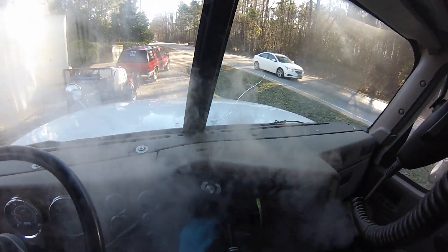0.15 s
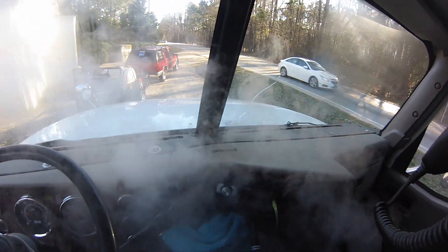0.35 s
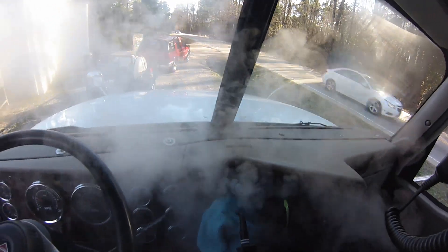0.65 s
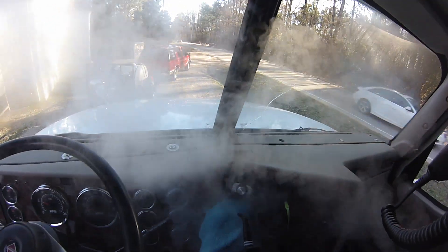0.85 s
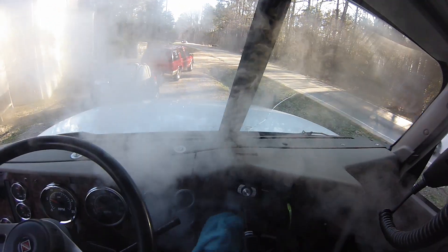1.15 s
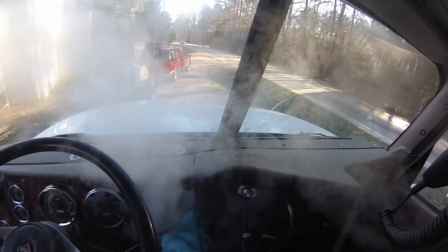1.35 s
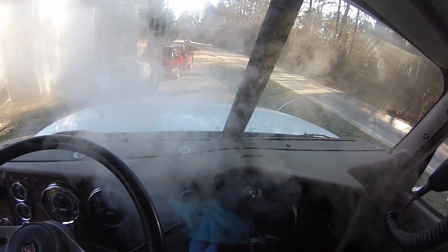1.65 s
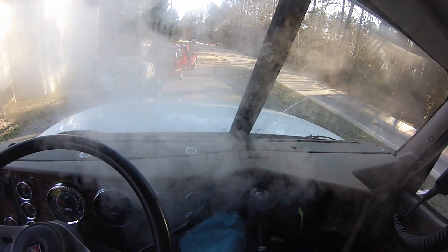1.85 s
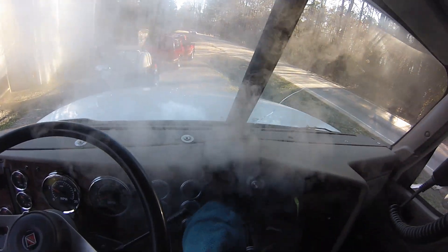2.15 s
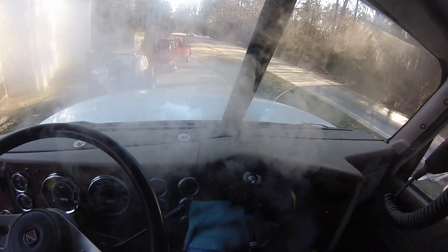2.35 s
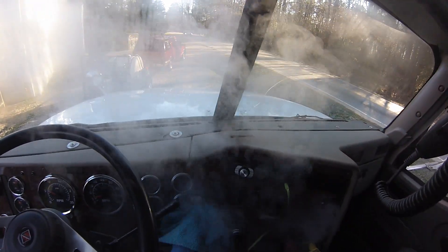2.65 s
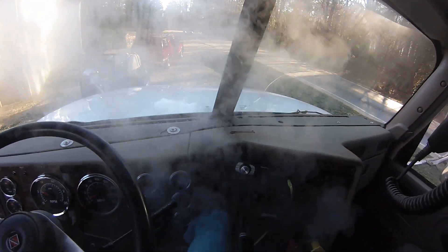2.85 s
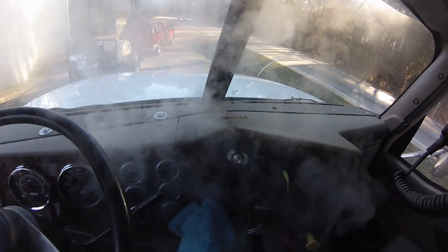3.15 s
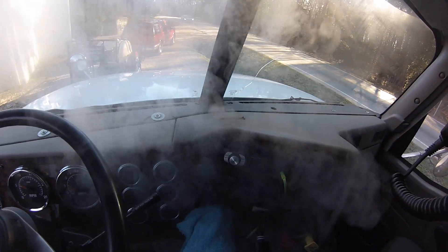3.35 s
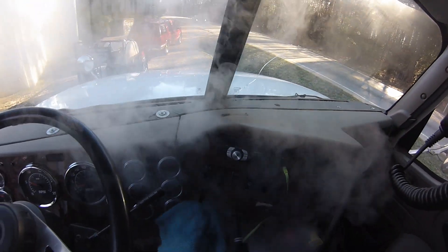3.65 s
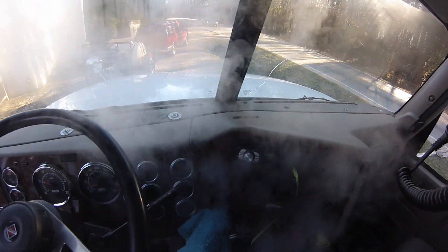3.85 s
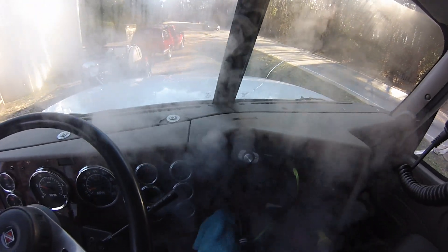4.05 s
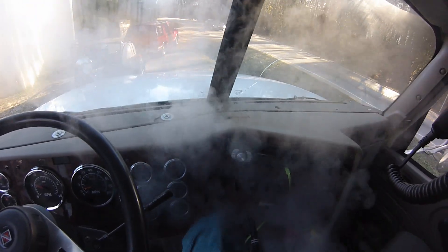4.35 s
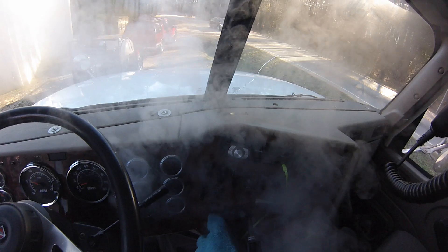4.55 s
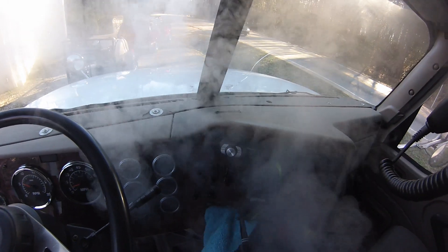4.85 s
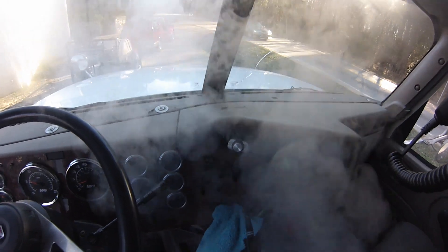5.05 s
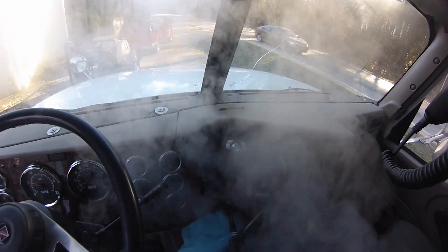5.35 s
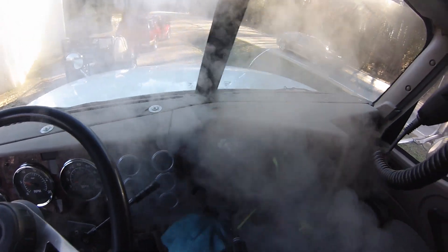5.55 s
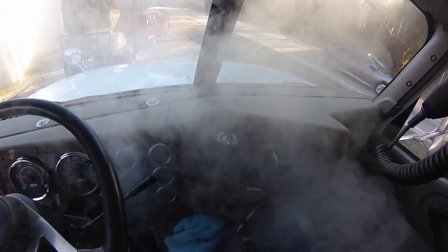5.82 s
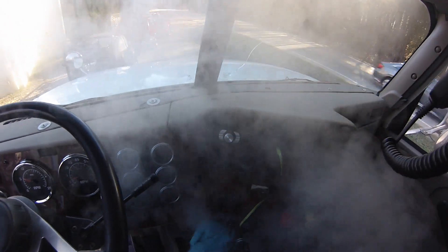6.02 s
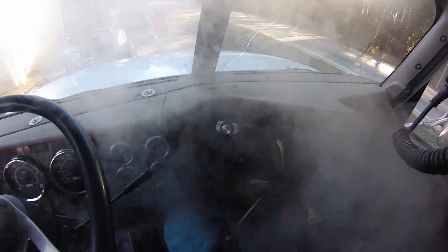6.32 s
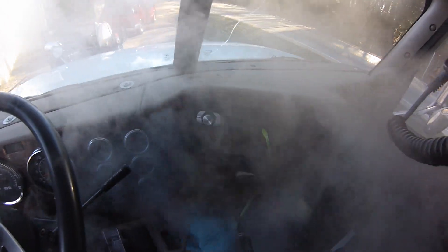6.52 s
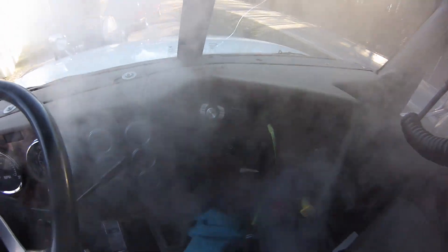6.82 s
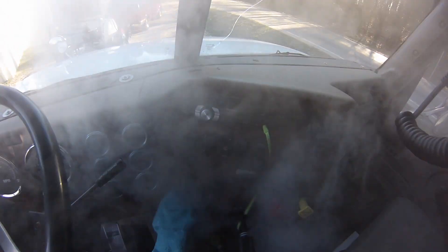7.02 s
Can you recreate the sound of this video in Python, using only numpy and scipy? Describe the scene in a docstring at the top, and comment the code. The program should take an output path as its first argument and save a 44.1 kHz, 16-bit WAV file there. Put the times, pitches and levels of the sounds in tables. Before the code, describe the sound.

A steam jet is already blowing at 0 s and continues to the end at about 7 s, close to a mono microphone in a small truck cab with very short reflections. Bright hiss with fine droplet spitting mixes with a strong sizzle around 5 to 6 kHz on plastic, sliding in colour. Brief dips come near 0.6 and 1.6 s. Light wand knocks fall around 0.3, 0.7 and 1.8 s, with sharper ticks at 2.15 and 3.1 s. A faint low car drone fades by 2.5 s; soft handling thumps also occur early. From about 3 s the hollow tone deepens as steam enters a recess. A dull knock comes at 4.25 s and a thin, wavering whistle peaks near 4.5 s. From 5.5 s the steam alternates rapidly between sizzle and airy gaps, with knocks near 6.2 and 6.75 s. A quiet motor hum runs underneath.

```python
"""The jet of a steam cleaner's nozzle, filtered noise with spitting droplets, hisses near a mono microphone.
It is swept over the dashboard of a truck cab: noise with two sliding resonances sizzles on the panel,
duller noise rushes along it, and resonant noise rings in hollows and gaps. A faint edge tone whistles.
Damped noise bursts are the wand's knocks. Below lie sine hums of a motor and of a car passing outside,
and the low noise of the cab with soft bumps of the hand that holds the microphone."""
import sys
import numpy as np
from scipy import signal
from scipy.fft import rfft, irfft, next_fast_len
from scipy.io import wavfile
from scipy.ndimage import uniform_filter1d

SR = 44100
rng = np.random.default_rng(int(sys.argv[2]) if len(sys.argv) > 2 else 0)


def digitize_waveform(pressure):
    """Quantize a signal to 16-bit integers and store it at the path in sys.argv[1].

    Rows of a 2-D input are taken as channels; values are limited to [-1, 1].
    """
    field = np.atleast_2d(pressure).T
    bounded = np.clip(field, -1, 1)
    quanta = np.round(bounded * 32767).astype(np.int16)
    wavfile.write(sys.argv[1], SR, quanta)


N = 316726
TIME = np.arange(N) / SR
FRAME_S = np.arange(N // 128 + 9) * 128 / SR  # times of the short-time spectra, 128 samples apart
BIN_HZ = np.fft.rfftfreq(512, 1 / SR)


def amp(db):
    """Level to amplitude: 20 dB is a factor of ten."""
    return 10 ** (np.asarray(db) / 20)


def unit(x):
    """Normalisation to a root-mean-square value of 1."""
    return x / np.sqrt(np.mean(x ** 2) + 1e-20)


def curve(rows, t=TIME):
    """Linear interpolation of a table's columns, its first column being time, at times t."""
    s, *columns = np.transpose(rows)
    return [np.interp(t, s, column) for column in columns]


def spectrum(points, hz):
    """Spectral envelope, linear in dB over log frequency; it drops 60 dB in the octave beyond each end."""
    f, db = np.transpose(points)
    knots_hz = np.r_[f[0] / 2, f, f[-1] * 2]
    knots_db = np.r_[db[0] - 60, db, db[-1] - 60]
    return amp(np.interp(np.log(hz + 1), np.log(knots_hz), knots_db))


def colour(x, gain):
    """Linear filtering: the spectrum of x times a gain that is a function of frequency; rms 1."""
    size = next_fast_len(len(x))
    filtered = rfft(x, size) * gain(np.fft.rfftfreq(size, 1 / SR))
    return unit(irfft(filtered, size)[:len(x)])


def drift(hz):
    """Low-passed random fluctuation: noise that weakens gradually above about hz; rms 1."""
    t = FRAME_S
    low_pass = 1 / (1 + (np.fft.rfftfreq(len(t), t[1]) / hz) ** 2)
    slow = irfft(rfft(rng.standard_normal(len(t))) * low_pass, len(t))
    return unit(np.interp(TIME, t, slow))


def add(mix, s, sound):
    """Superposition: adds a sound to the mix, in place, from time s."""
    part = mix[max(round(s * SR), 0):][:len(sound)]
    part += sound[:len(part)]


def turbulence(shape, patchy_db, waver_db=0):
    """Turbulent noise: random short-time spectra; eddies make quick patches, the swinging jet slower ones."""
    real, imaginary, eddies, swing = rng.standard_normal((4, len(FRAME_S), len(BIN_HZ)))
    # smoothing over frames (time), then over bins (frequency)
    eddies = unit(uniform_filter1d(uniform_filter1d(eddies, size=12, axis=0), size=7, axis=1))
    swing = unit(uniform_filter1d(uniform_filter1d(swing, size=48, axis=0), size=3, axis=1))
    z = (real + 1j * imaginary) * shape * amp(patchy_db * eddies + waver_db * swing)
    return unit(signal.istft(z.T, nperseg=512, noverlap=384)[1][:N])


def echoes(x, strength, count=5):
    """Comb filtering: nearby panels return the hiss within milliseconds; the swaying nozzle makes it glide."""
    out = x.copy()
    # mean delay/s, sway rate/Hz, starting phase/cycles
    for delay, sway_hz, start in rng.uniform([.0008, .15, 0], [.004, .45, 1], (count, 3)):
        path_s = delay * (1 + np.sin(2 * np.pi * (sway_hz * TIME + start)) / 6)
        out += strength * rng.choice([-1, 1]) * np.interp(TIME - path_s, TIME, x)
    return out


def cab(x, wet, t60, count=24):
    """Reverberation between glass and panels: sparse decaying reflections that change as the nozzle travels."""
    t, hop = np.arange(SR // 10) / SR, N // count + 1
    out = x.copy()
    for k in range(count + 1):
        sparse = (rng.standard_normal(len(t)) * (rng.random(len(t)) < .05)) * (t > .002)
        taps = sparse * amp(-60 * t / t60)
        at = np.arange(max(k - 1, 0) * hop, min((k + 1) * hop, N))
        piece = x[at] * np.cos(np.pi / 2 * (at / hop - k))  # neighbouring pieces cross-fade at equal power
        add(out, at[0] / SR, wet * signal.fftconvolve(piece, taps / np.linalg.norm(taps)))
    return unit(out)


def jet(sputter):
    """Free-jet noise: turbulent mixing at the nozzle hisses brightly, and droplets spit as random impulses."""
    # slow course of the free jet: t/s, relative level/dB
    course = [(0, -26.5), (1.4, -27.5), (2.15, -27.5), (2.8, -28.5), (3.8, -27), (4.8, -28), (5.2, -27),
              (7.18, -27.5)]
    # envelope of the jet noise: f/Hz, relative level/dB
    envelope = [(3000, -36), (4100, -0.5), (4800, -4.5), (6000, 4), (7900, 8.5), (9200, 1), (11000, 0),
                (13800, -1), (15300, -6.5)]
    level_db, = curve(course)
    hiss = turbulence(spectrum(envelope, BIN_HZ), patchy_db=2.0, waver_db=0.64)
    drops = rng.standard_normal(N) * (rng.random(N) < 500 / SR)  # about 500 a second
    spray = hiss + amp(-29) * colour(drops, lambda f: spectrum(envelope, f))
    return amp(level_db + 4.5 + 0.15 * sputter) * cab(echoes(spray, strength=0.11), wet=0.42, t60=0.077)


def strike(sputter):
    """Impingement noise: the jet sizzles on the panel, coloured by two resonances of the space between."""
    # slow course of the sizzle: t/s, relative level/dB
    course = [(0, -22.5), (.3, -20.5), (.95, -20.5), (1.3, -19), (1.7, -22.3), (2.58, -23), (2.72, -18),
              (3.6, -18.5), (4.05, -17.5), (4.85, -20.5), (5.45, -16.5), (5.8, -25.5), (6.85, -24),
              (7.18, -19.5)]
    # envelope of the sizzle: f/Hz, relative level/dB
    envelope = [(3000, -53), (4150, -10.5), (4650, -1), (5300, -2), (6100, -2), (6750, -2.5), (7300, -15),
                (7900, -8.5), (9000, -15), (14000, -26)]
    # resonances between nozzle and panel, sliding as the wand moves: t/s, lower f/Hz, upper f/Hz, prominence/dB
    slide = [(0, 5500, 5900, 8), (.3, 4950, 6000, 0), (.7, 5080, 5730, 13), (.97, 4500, 5430, -1),
             (1.19, 5100, 5940, 11), (1.45, 5700, 6100, 6.5), (2.15, 5000, 5650, -1), (3, 5200, 5820, 11),
             (3.35, 5500, 6250, 5), (3.7, 5160, 5900, 5.5), (4.1, 5220, 5600, 6), (4.8, 4950, 5460, 6.5),
             (5.42, 5200, 5570, 4.5), (5.85, 5640, 6300, 9), (5.95, 4500, 5200, 6), (6.07, 5400, 5950, 4.5),
             (7.18, 5360, 6080, 10)]
    level_db, = curve(course)
    lower_hz, upper_hz, prominence_db = (column[:, None] for column in curve(slide, FRAME_S))
    peaks = sum(1 / (1 + ((BIN_HZ - hz) / 130) ** 2) for hz in (lower_hz, upper_hz))
    shape = spectrum(envelope, BIN_HZ) * amp(prominence_db * peaks)
    shape /= np.linalg.norm(shape, axis=1, keepdims=True)  # the resonances share out the power, they add none
    sizzle = turbulence(shape, patchy_db=1.38, waver_db=1.14)
    return amp(level_db + 0.88 + 0.45 * sputter) * cab(echoes(sizzle, strength=0.11), wet=0.49, t60=0.056)


def rush():
    """Wall-flow noise: the slowed, spent steam spreads over the dashboard as a duller wash."""
    # slow course of the wash: t/s, relative level/dB
    course = [(0, -40), (.65, -38.5), (.9, -37.5), (1.85, -44.5), (2.12, -37), (2.48, -46), (3.5, -37.5),
              (4.9, -39), (5.4, -36), (6.3, -35), (7.18, -36)]
    # envelope of the wash: f/Hz, relative level/dB
    envelope = [(200, -27), (420, -17), (700, -0.5), (1000, 0.5), (2000, 1.5), (2450, 1.5), (3600, 0.5),
                (4100, -4), (6000, -7)]
    level_db, = curve(course)
    wash = turbulence(spectrum(envelope, BIN_HZ), patchy_db=2.0, waver_db=1.6)
    return amp(level_db + 6.0) * cab(wash, wet=0.72, t60=0.079)


def hollows():
    """Cavity resonance: blown hollows ring, more narrowly as more steam enters the deep recess."""
    # slow course of the blowing: t/s, relative level/dB
    course = [(0, -25), (1.3, -30), (1.6, -27), (2.2, -28), (2.9, -24), (3.35, -22), (3.7, -21.5),
              (4.6, -25), (5.05, -21.5), (5.5, -23.5), (6.4, -25.5), (6.55, -22.5), (7.18, -22)]
    # steam that enters the deep recess: t/s, share of power/0-1
    recess_share = [(0, 0.38), (1.2, 0.02), (2.7, 0.09), (3.2, 1), (4.2, 0.95), (7.18, 1)]
    # envelopes of the open panel and of the deep recess: f/Hz, relative level/dB
    open_panel = [(420, -23), (510, -19), (580, -13), (680, -14), (750, -11), (830, -5), (930, -5),
                  (1020, -1), (1130, -3), (1450, .5), (1800, -5), (2000, -11), (2400, -22)]
    deep_recess = [(420, -30), (500, -22), (600, -16), (700, -13), (800, -12), (930, -12), (1100, -8.5),
                   (1250, -2.5), (1480, .5), (1750, -3.5), (1950, -12), (2400, -22)]
    # resonances and dips: f/Hz, width at half the dB height/Hz, height/dB
    modes = [(813, 35, 3), (872, 30, 1.5), (925, 40, -4), (1009, 50, 3), (1215, 70, 2.5), (1310, 50, -3),
             (1400, 70, 3), (1525, 90, 2), (1770, 80, 1.5)]
    level_db, = curve(course)
    share = np.clip(curve(recess_share)[0], 0, 1)

    def ripple(f):
        return amp(sum(db / (1 + (2 * (f - hz) / width) ** 2) for hz, width, db in modes))

    def ring(shape):
        return colour(turbulence(1, patchy_db=1.08, waver_db=0.4), lambda f: spectrum(shape, f) * ripple(f))

    blown = np.sqrt(1 - share) * ring(open_panel) + np.sqrt(share) * ring(deep_recess)
    return amp(level_db - 0.03) * cab(blown, wet=0.57, t60=0.11)


def gaps():
    """Resonance of narrow gaps: steam blown across the trim excites overlapping modes, an airy, higher note."""
    # slow course of the blowing: t/s, relative level/dB
    course = [(0, -24.5), (.9, -25), (1.35, -25), (1.8, -28.5), (2.25, -23), (2.6, -27), (3.5, -30),
              (4.7, -27), (5.6, -31), (6.3, -36), (6.62, -22.5), (6.85, -31), (7.1, -27)]
    # modes: f/Hz, half-width at -12 dB/Hz, relative level/dB
    modes = [(2916, 590, -5.5), (3097, 270, -3), (3370, 84, -4), (3680, 290, -4.5)]
    level_db, = curve(course)

    def response(f):
        return sum(amp(db) / (1 + ((f - hz) / width) ** 2) ** 2 for hz, width, db in modes)

    blown = colour(turbulence(1, patchy_db=1.5, waver_db=1.2), response)
    return amp(level_db - 1.66) * cab(blown, wet=0.82, t60=0.081)


def whistle():
    """Edge tone: the jet splits on an edge; random modulation of a rotating phasor makes it unsteady."""
    # t/s, f/Hz, level/dB
    course = [(3.7, 8150, -55), (4.1, 8050, -41), (4.5, 8040, -27.5), (4.8, 8000, -42), (5.1, 7780, -42),
              (5.35, 7800, -56)]
    hz, level_db = curve(course)
    sounding = (TIME > course[0][0]) & (TIME < course[-1][0])
    phasor = np.exp(2j * np.pi * np.cumsum(hz) / SR)
    tone = unit((phasor * (drift(130) + 1j * drift(130))).real)
    return sounding * amp(level_db) * tone


def pulse(s, length, steepness=2):
    """Bell-shaped window of height 1 centred on s, length wide at 1/e; more steepness sharpens its edges."""
    return np.exp(-abs(2 * (TIME - s) / length) ** steepness)


def wand():
    """Level modulation in dB: moving wand and uneven steam supply change each part of the steam sound."""
    # the supply falters or surges briefly: t/s (centre), length/s, change of level/dB
    spurts = [(0.62, 0.13, -6.5), (1.63, 0.12, -6), (3.78, 0.077, 0.5), (4.15, .1, 1.5), (5.8, 0.078, -3.5),
              (6.27, 0.062, -3.5), (6.734, 0.17, -4)]
    # the jet crosses an edge of the trim, which steers the steam onto the panel or into gaps and hollows:
    # t/s (centre), length/s, change of sizzle level/dB, of gap level/dB, of hollow level/dB
    crossings = [(0.343, .07, -1.5, -4.5, 3), (0.486, 0.097, -2.5, -6, 2.5), (0.563, .06, -1, 5.5, 1),
                 (0.663, .06, -4, 0.5, 4), (1.176, .1, 1.5, 0, 1.5), (2.41, .1, -2, -5, 0),
                 (2.82, 0.094, -2, -2.5, -6.5), (3.1, .09, -2.5, -2, 0), (3.285, 0.07, -5.5, 3.5, 2.5),
                 (3.484, 0.11, -5, -2, 1), (3.705, 0.19, -4, 0, -2.5), (5.54, .1, -7, 6.5, 2),
                 (5.67, .16, 2.5, 4.5, -2), (5.867, 0.054, 2.5, -2, 1), (5.948, 0.078, 0, 6, 3),
                 (6.08, 0.055, 2.5, 1, 2), (6.198, 0.079, 5.5, -1, 1), (6.577, 0.061, 2, -4, 0.5),
                 (6.854, 0.064, -5, -1, 0), (6.975, .1, 4, -2.5, 1), (7.07, 0.11, -5.5, 6.5, 2)]
    spurt = sum(change_db * pulse(s, length) for s, length, change_db in spurts)
    sizzle, gap, hollow = sum(np.outer(change_db, pulse(s, length, steepness=4))
                              for s, length, *change_db in crossings)

    def flutter(depth_db):
        """Random modulation by scrubbing, up to about 6.5 Hz, of a given rms depth."""
        return depth_db * drift(6.5)

    # factors of spurt: the share of its dB change that reaches each part
    return dict(jet=spurt + flutter(0.5),
                strike=sizzle + 0.28 * spurt + flutter(0.5),
                gaps=gap + 0.79 * spurt + flutter(1.2),
                hollows=hollow + flutter(0.7),
                rush=0.33 * spurt + flutter(0.7))


def knocks():
    """Damped impact: the wand's knocks on plastic trim are noise bursts that decay exponentially."""
    # t/s, level at onset/dB, tilt about 1 kHz/(dB per octave), time to fall 60 dB/s
    impacts = [(0.308, -27, 0, 0.25), (.69, -23, 1, 0.15), (1.764, -37, -6, 0.39), (2.154, -14.5, 2, .05),
               (3.128, -12, 1.5, 0.04), (4.254, -26, -3, 0.27), (4.928, -34, -5, .08),
               (6.226, -30, -13, 0.12), (6.759, -24, -1, 0.22)]
    # envelope before the tilt: f/Hz, relative level/dB
    envelope = [(120, -26), (260, -11), (450, -13), (900, -3), (1400, 0), (1900, -1), (2500, -13),
                (3100, -14), (5000, -22), (12000, -38)]
    out, t = np.zeros(N), np.arange(SR // 4) / SR
    for s, level_db, tilt_db, t60 in impacts:
        body = colour(rng.standard_normal(len(t)),
                      lambda f: spectrum(envelope, f) * amp(tilt_db * np.log2((f + 1) / 1000)))
        dying = amp(-60 * t / t60)
        # the rms of the decay sets the level, so that quickly damped knocks carry less energy
        add(out, s, amp(level_db) * unit(dying * body) * np.sqrt(np.mean(dying ** 2)))
    return out


def motor():
    """Harmonic series of a rotating shaft: sines on multiples of its speed, wavering a little."""
    # multiple of the shaft speed, mean rms level/dB
    harmonics = [(2, -43.5), (4, -41.5), (5, -50), (6, -45), (8, -58), (10, -63)]
    shaft_hz = 30.1
    turns = np.cumsum(shaft_hz * (1 + .0012 * drift(1.34))) / SR
    return sum(amp(db + 0.48 * drift(3.1)) * np.sqrt(2) * np.sin(2 * np.pi * (round(k) * turns + rng.random()))
               for k, db in harmonics)


def car():
    """Engine drone of a car going by outside: a faint low sine of gliding frequency and wavering level."""
    # t/s, f/Hz, mean peak level/dB
    course = [(0, 95.7, -38.5), (.8, 93, -42), (1.7, 100, -38), (2.3, 95, -63), (3, 94, -80)]
    hz, level_db = curve(course)
    return amp(level_db + 1.7 * drift(3)) * np.sin(2 * np.pi * np.cumsum(hz) / SR)


def rumble():
    """Low-frequency background: filtered noise of the cab, and windowed sines as the hand bumps the microphone."""
    # envelope of the cab noise: f/Hz, relative level/dB
    envelope = [(8, 6), (20, 5), (45, 1.5), (80, -1), (100, -1), (135, -17), (170, -8), (220, -12.5),
                (330, -15.5), (500, -20), (1200, -17.5)]
    # bumps: t/s (centre), peak level/dB, f/Hz, length/s
    bumps = [(.1, -27.5, 27.2, 0.22), (0.406, -33, 26, .24), (0.732, -29, 20.7, 0.17),
             (2.403, -29, 29.8, 0.227)]
    out = amp(-38.0) * colour(rng.standard_normal(N), lambda f: spectrum(envelope, f))
    for s, level_db, hz, length in bumps:
        t = np.arange(0, length, 1 / SR)
        swell = np.hanning(len(t)) * np.sin(2 * np.pi * (hz * t + rng.random()))
        add(out, s - length / 2, amp(level_db) * swell)
    return out


def scene():
    """Superposition at one microphone; wet steam makes jet and sizzle sputter together."""
    sputter, change_db = drift(40), wand()
    parts = dict(jet=jet(sputter), strike=strike(sputter), rush=rush(), hollows=hollows(), gaps=gaps())
    steam = sum(amp(change_db[name]) * sound for name, sound in parts.items())
    mono = steam + whistle() + knocks() + motor() + car() + rumble()
    return np.array([mono, mono])


def record(dry):
    """Band limitation: a linear-phase low-pass removes what lies above the recorder's 15.4 kHz edge."""
    low_pass = signal.firwin(511, 15400, window=("kaiser", 9), fs=SR)
    return signal.oaconvolve(dry, low_pass[None], "same")


dry = scene()
out = record(dry)
digitize_waveform(out)
```